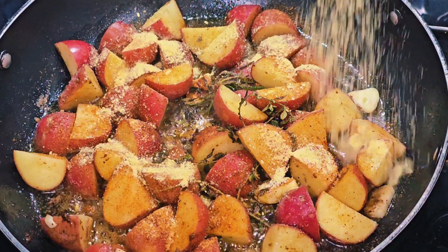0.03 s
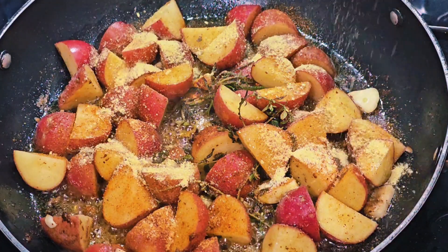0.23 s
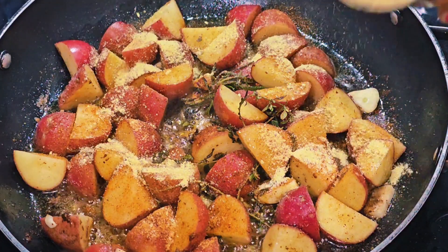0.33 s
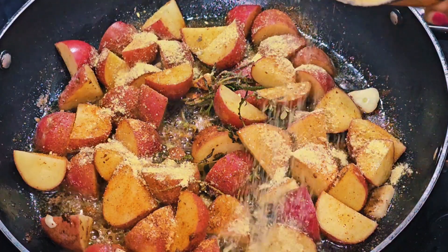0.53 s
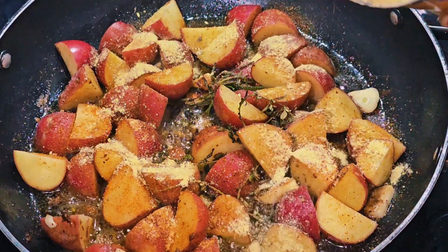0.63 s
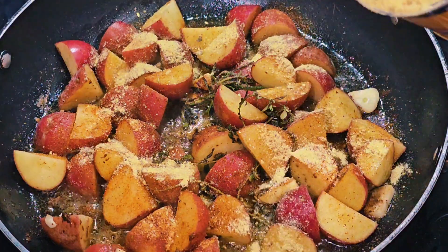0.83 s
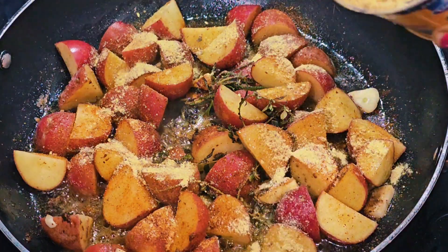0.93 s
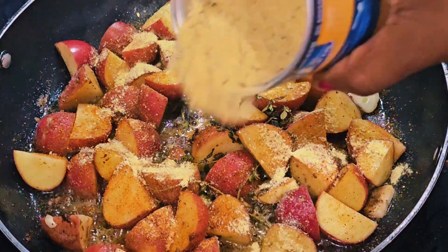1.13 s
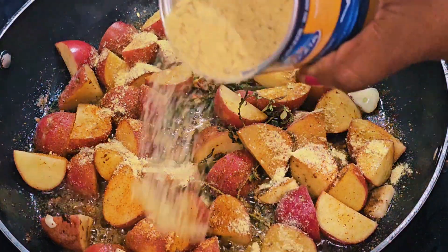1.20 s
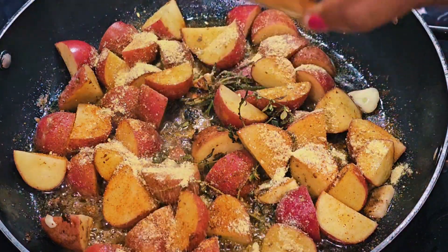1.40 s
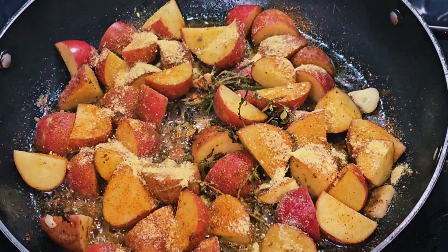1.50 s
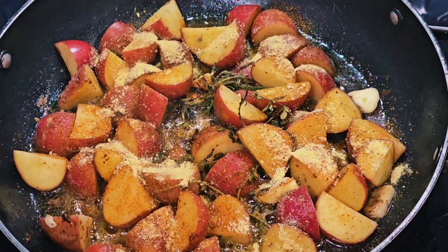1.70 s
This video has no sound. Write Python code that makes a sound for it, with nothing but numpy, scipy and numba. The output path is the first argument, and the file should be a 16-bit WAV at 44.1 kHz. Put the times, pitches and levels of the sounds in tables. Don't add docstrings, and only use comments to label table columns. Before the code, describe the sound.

A can of dry crumbs gives one hard hollow tap, then rattles unevenly as grains hit its wall, slide over the rim and patter onto food and metal; close microphone, short room echo, soft hand bumps.

```python
import sys
import numpy as np
from scipy import signal
from scipy.fft import rfft, irfft
from scipy.io import wavfile
from scipy.ndimage import uniform_filter1d
from numba import njit

SR = 44100
rng = np.random.default_rng(int(sys.argv[2]) if len(sys.argv) > 2 else 0)


def store_wav(level_fs):
    pcm = np.round(np.clip(np.atleast_2d(level_fs), -1, 1) * 32767)
    wavfile.write(sys.argv[1], SR, pcm.T.astype(np.int16))


def attenuation_scalar(level_db):
    decades = np.asarray(level_db, float) / 20
    return 10 ** decades


N = 77175
T = np.arange(N) / SR

# start in seconds, length in seconds, level in dB.
HAND_BUMPS = [(0.224, 0.18, -46), (0.36, 0.39, -45.5), (0.502, 0.07, -38), (0.628, 0.13, -50.5),
              (0.753, 0.17, -52.5), (0.909, 0.05, -45.5), (0.97, 0.059, -49), (1.044, 0.084, -39.5),
              (1.12, 0.074, -55), (1.205, 0.051, -39), (1.265, 0.076, -35.5), (1.33, 0.13, -41.5),
              (1.424, 0.21, -44.5), (1.58, 0.28, -54), (1.722, 0.027, -40.5)]
# time in seconds, level in dB.
LANDING_LEVEL = [(0, -55), (.19, -58), (.36, -38.5), (.41, -36.5), (.49, -26.5), (.55, -39.5), (.7, -40.5),
                 (.76, -42), (.8, -59), (.87, -42), (1.2, -40), (1.27, -64), (1.75, -41)]
# centre in Hz, width in Hz, level in dB.
PAN_TONES = [(497.7, 48, -5), (620, 135, -3), (760, 64, -2.5), (960, 33, -2.5), (1175, 390, -5.5)]
# time in seconds, crumb level in dB, fine dust relative to it in dB.
SLIDE_LEVEL = [(0, -47, 0), (.09, -46.5, -24), (.112, -37, -6), (.19, -46.5, 2), (.36, -41.5, -17),
               (.54, -44.5, -6.5), (.57, -31, -6), (.69, -32, -31), (.8, -36.5, -11.5), (.93, -40, -10),
               (1.1, -30.5, 1), (1.26, -42.5, 10), (1.36, -47.5, 1), (1.64, -49.5, -11), (1.75, -43.5, 12)]
# centre in Hz, width in Hz, level in dB.
RIM_TONES = [(4200, 1030, 14), (5070, 1800, 14.5), (2600, 680, 13.5)]
# centre in Hz, width in Hz, level in dB.
DUST_TONES = [(10760, 3000, 8.5), (12040, 2060, 17), (14100, 2200, 6.5)]
# frequency in Hz, density in dB per Hz.
WASH_SPECTRUM = [(150, -32), (300, -12.5), (1200, -18), (4500, -16.5), (6900, -13.5), (10500, -15),
                 (15500, -58)]
# start in seconds, length in seconds, level in dB, first pitch in Hz, last pitch in Hz.
CRUMB_STREAMS = [(0.05, 0.22, -38.5, 4040, 4200), (0.038, 0.081, -37.5, 4700, 5360),
                 (0.1, 0.19, -38.5, 6250, 5960), (.3, 0.17, -43, 7500, 8350), (0, 0.21, -42, 10400, 10100),
                 (0.26, 0.38, -41, 4200, 4020), (0.546, 0.2, -33, 5400, 5000),
                 (0.656, 0.084, -32, 4720, 4770), (0.41, 0.43, -34, 2114, 2236),
                 (0.64, 0.34, -40.5, 7430, 8340), (0.914, 0.32, -31.5, 8020, 7300),
                 (0.95, 0.29, -33, 3000, 3010), (1.0, 0.24, -36, 6230, 6300), (1.11, 0.3, -39, 4700, 4900),
                 (1.274, 0.33, -44, 5140, 5190), (1.212, 0.16, -44, 3860, 3670),
                 (1.403, 0.21, -34, 1302, 1573), (1.428, 0.44, -39.5, 2050, 2110),
                 (1.468, 1, -33, 2920, 3070), (1.532, 0.17, -41, 8200, 7400),
                 (1.655, 0.34, -33.5, 2400, 2600), (0.41, 0.14, -37.5, 620, 795),
                 (0.56, 0.21, -40, 517, 641), (0.643, 0.12, -40, 760, 787), (1.49, 0.116, -48.5, 620, 570),
                 (1.57, 0.087, -41, 731, 823), (1.66, 0.088, -42, 700, 578), (1.27, 0.097, -50.5, 960, 955),
                 (1.3, 0.08, -45, 1070, 1115), (0.54, 0.057, -32, 2180, 2060),
                 (0.79, 0.11, -34.5, 2720, 2760), (1.05, 0.19, -42, 2230, 2060), (1.1, 0.15, -45, 484, 563),
                 (1.71, 0.059, -38.5, 6170, 6600), (0.0, 0.18, -59, 329, 328),
                 (0.0, 0.12, -42.5, 7800, 8340), (0.9, 0.17, -36.5, 2580, 2570)]
# start in seconds, peak in dB, pitch in Hz, width in Hz.
HARD_CRUMBS = [
    (0.036, -29.5, 10200, 1500),
    (0.1087, -13.5, 10370, 3500),
    (0.213, -1.5, 8930, 3000),
    (0.559, -13, 3800, 3440),
    (0.678, -5.5, 4400, 3650),
    (0.73, -14.5, 3870, 3070),
    (.545, -43, 5460, 3500),
    (1.583, -21, 12500, 4000),
]
# pitch in Hz, first blow in dB, second blow in dB, rebound in dB, T60 in seconds.
CAN_MODES = [(334, -8.5, -7, 7.5, 0.036), (466, -3, -2, -4.5, 0.061), (752, -2.5, 3.5, 2.5, 0.074),
             (818, 1, 2.5, 4, 0.077), (942, -3, 3.5, -5, 0.08), (1160, 2.5, 4.5, -1.5, 0.17),
             (1329, -21, -13, -11, 0.32), (1732, 11.5, 6, -7, 0.079), (2915, -35, -2, -7, 0.077),
             (1960, -17, -4.5, -2, 0.12), (2326, -16, 0, -26, 0.13), (2396, -13, -8, -22, 0.11)]
# start in seconds, rise in seconds, chatter length in seconds, ring in dB, crumb jolt in dB.
KNOCK_BLOWS = [
    (.211, 0.0096, .02, -10.5, -12),
    (.229, 0.0051, 0.024, -12, -16),
    (.272, 0.014, 0.081, -22, -29),
]
# frequency in Hz, density in dB per Hz.
JOLT_SPECTRUM = [(1000, -25), (2000, -4), (3300, -20.5), (5000, -13.5), (6800, -27), (9300, -13),
                 (15500, -46)]
# time in seconds, level in dB, mouth brightness relative to it in dB.
RATTLE_LEVEL = [(0, -51, 8.5), (.19, -43.5, 4.5), (.36, -30.5, -12), (.42, -34, -16.5), (.5, -25, -12),
                (.57, -27.5, -18), (.6, -33, -8.5), (.7, -31.5, 0), (.8, -38.5, 0.5), (.92, -36, 1),
                (.98, -30.5, 1.5), (1.1, -30.5, 8), (1.27, -29, 0), (1.37, -34.5, 1), (1.52, -29.5, 1),
                (1.64, -29.5, -5.5), (1.75, -26.5, -9)]
# time in seconds, pitch in Hz.
TILT_PITCH = [(0, 1704), (.6, 1692), (.7, 1628), (.9, 1671), (1.08, 1594), (1.3, 1595), (1.43, 1602),
              (1.53, 1700), (1.62, 1719), (1.75, 1550)]
# centre in Hz, width in Hz, level in dB.
MOUTH_TONES = [(9296, 770, 11.5), (14100, 900, -1)]
# time in seconds, peak in dB.
WALL_LUMPS = [(0.3677, -27), (0.4345, -25), (0.4564, -23), (0.4875, -14.5), (0.5035, -14.5), (0.519, -18.5),
              (0.5332, -16.5), (0.5463, -22.5), (0.5574, -18), (0.5746, -20), (0.6212, -21), (0.655, -23),
              (0.677, -23), (0.6904, -20.5), (0.7235, -21.5), (0.831, -25), (0.9507, -22), (0.968, -17.5),
              (0.9786, -16.5), (1.0425, -24.5), (1.0745, -20), (1.0923, -20.5), (1.1223, -22),
              (1.184, -19.5), (1.2063, -19.5), (1.248, -27), (1.2739, -19.5), (1.3696, -29), (1.3883, -26),
              (1.4087, -24), (1.4244, -23), (1.4496, -25.5), (1.4677, -30), (1.482, -20), (1.508, -17.5),
              (1.5216, -18), (1.5542, -26), (1.5784, -19.5), (1.6069, -21), (1.6583, -32), (1.683, -21.5),
              (1.73, -21.5)]
# time in seconds, peak in dB.
MOUTH_CLICKS = [(0.0862, -33), (0.603, -18.5), (0.9293, -19.5), (0.9752, -21), (0.9956, -16), (1.0184, -24),
                (1.049, -19), (1.0624, -20), (1.0714, -12), (1.0779, -9), (1.0884, -16), (1.0974, -20),
                (1.1044, -8), (1.1124, -11), (1.1214, -15), (1.1488, -13), (1.161, -8), (1.1834, -17),
                (1.2054, -22), (1.3074, -16), (1.3114, -12), (1.3274, -17), (1.4681, -25), (1.482, -21),
                (1.4895, -20), (1.5209, -17), (1.5454, -18)]

BUMP_HZ, HARDER_HZ_PER_DB = 102.5, 5.5
WASH_DB = -10.5
STREAM_Q, STREAM_EDGE_FRACTION = 13.0, 0.3
TICK_T60_S, SCATTER_T60_S, SCATTER_DB = 0.016, 0.14, -6
JOLT_T60_S, FIRST_CONTACT = 0.16, 1.1
CAN_Q, CORE_Q, CORE_DB = 6.5, 40.0, -3
CLICK_HZ, CLICK_WIDTH_HZ = 9300, 440
LUMP_DB, CLICK_DB, LOOSE_DB, MOUTH_DB = -2.5, 0, -2.5, -2.5
ECHO_T60_S, ECHO_DB, ECHO_DELAY_S = 0.1, -9, 0.004
BASS_HZ, TOP_HZ = 50, 15750


def level(x):
    return x / np.sqrt(np.mean(x ** 2))


def band(x, hz, width_hz):
    return signal.lfilter(*signal.iirpeak(min(hz, 0.45 * SR), hz / width_hz, fs=SR), x)


def body(x, tones):
    out = 0
    for hz, width_hz, db in tones:
        ring = band(band(x, hz, 2 * width_hz), hz, width_hz)
        out = out + attenuation_scalar(db) * level(ring)
    return level(out)


def colour(x, spectrum):
    p = np.array(spectrum, float)
    hz = np.fft.rfftfreq(N, 1 / SR) + 1
    gain = attenuation_scalar(np.interp(np.log(hz), np.log(p[:, 0]), p[:, 1]))
    return level(irfft(rfft(x) * gain, N))


def curve(table, *cols):
    p = np.array(table, float)
    return np.interp(T, p[:, 0], sum(p[:, c] for c in cols))


def walk(rate_hz):
    k = int(SR / rate_hz)
    steps = np.repeat(rng.standard_normal(N // k + 1), k)
    smooth = uniform_filter1d(uniform_filter1d(steps, k), k)
    return level(smooth[:N])


@njit
def sweep(x, hz, q):
    y, b, l, k = np.empty(len(x)), 0., 0., 1 / q
    for i in range(len(x)):
        g = np.tan(np.pi * hz[i] / SR)
        v = (b + g * (x[i] - l)) / (1 + g * (g + k))
        b, l, y[i] = 2 * v - b, l + 2 * g * v, k * v
    return y


def crumbs(rate_hz, spread_db, dust, clump_db):
    chance, sign, size = rng.random((3, N))
    hits = (chance < rate_hz / SR) * np.sign(sign - 0.5) * attenuation_scalar(-spread_db * np.log(size + 0.03))
    return (level(hits) + dust * rng.standard_normal(N)) * attenuation_scalar(clump_db * walk(25.87))


def strikes(table, ring):
    x, unit = np.zeros(N), np.zeros(N)
    unit[N // 2] = 1
    for start_s, db in table:
        x[int(start_s * SR)] += attenuation_scalar(db)
    return ring(x) / np.abs(ring(unit)).max()


def hand():
    out, wobble = np.zeros(N), walk(29.96)
    rub = level(band(band(rng.standard_normal(N), 66, 112), 126, 127))
    for start_s, length_s, db in HAND_BUMPS:
        env = np.sin(np.pi * np.clip((T - start_s) / length_s, 0, 1) ** 0.76)
        hz = BUMP_HZ + HARDER_HZ_PER_DB * max(db + 44.5, 0)
        thud = np.sin(2 * np.pi * np.cumsum(hz * (1 + 0.0572 * wobble)) / SR)
        out += attenuation_scalar(db) * env * (thud + 0.5 * rub)
    return out


def land():
    out = np.zeros(N)
    for hz, width_hz, db in PAN_TONES:
        tone = body(crumbs(400, 3.0, 0.7, 1.5), [(hz, width_hz, 0)])
        out += attenuation_scalar(db + 3.0 * walk(8)) * tone
    return attenuation_scalar(curve(LANDING_LEVEL, 1)) * out / 2


def slide():
    mid = attenuation_scalar(curve(SLIDE_LEVEL, 1))
    top = attenuation_scalar(curve(SLIDE_LEVEL, 1, 2))
    rim = mid * body(crumbs(1500, 3.0, 0.7, 1), RIM_TONES)
    dust = top * body(crumbs(2500, 2.5, 0.8, 1), DUST_TONES)
    wash = (mid + top) * colour(crumbs(4000, 2.5, 0.8, 1.0), WASH_SPECTRUM)
    return rim + dust + attenuation_scalar(WASH_DB) * wash


def streams():
    out, grains = np.zeros(N), crumbs(1100, 2.6, 0.94, 0.)
    for k, (start_s, length_s, db, from_hz, to_hz) in enumerate(CRUMB_STREAMS):
        u = np.clip((T - start_s) / length_s, 0, 1)
        on = (u > 0) & (u < 1)
        hz = from_hz + (to_hz - from_hz) * u[on]
        own_grains = np.roll(grains, k * 3001)[on]
        ring = level(sweep(sweep(own_grains, hz, STREAM_Q), hz, STREAM_Q / 2))
        swell = np.clip(np.minimum(u, 1 - u)[on] / STREAM_EDGE_FRACTION, 0, 1)
        out[on] += attenuation_scalar(db) * swell * ring
    return out


def ticks():
    out, t = np.zeros(N), T[:4096]
    for start_s, db, hz, width_hz in HARD_CRUMBS:
        scatter = attenuation_scalar(SCATTER_DB - 60 * t / SCATTER_T60_S) * crumbs(700, 3.5, 0.5, 0.)[:len(t)]
        snap = rng.standard_normal(len(t)) * attenuation_scalar(-60 * t / TICK_T60_S)
        tick = band(band(snap + scatter, hz, width_hz), hz, width_hz)
        i = int(start_s * SR)
        out[i:i + len(t)] += attenuation_scalar(db) * tick / np.abs(tick).max()
    return out


def knock():
    out = np.zeros(N)
    for k, (start_s, rise_s, hold_s, ring_db, jolt_db) in enumerate(KNOCK_BLOWS):
        t = T - start_s
        rise = np.clip(t / rise_s, 0, 1)
        fade = attenuation_scalar(-230 * np.clip(t, 0, 1))
        push = rise * (t < hold_s) * fade * crumbs(922, 3.2, 0.69, 0.)
        if k == 0:
            push[int((start_s + rise_s) * SR)] += FIRST_CONTACT
        ring = np.zeros(N)
        for mode in CAN_MODES:
            hz, t60_s = mode[0], mode[4]
            tone = level(band(push, hz, np.log(1000) / np.pi / t60_s))
            ring += attenuation_scalar(mode[1 + k]) * tone * np.sqrt(t60_s)
        during = (t > 0) & (t < hold_s)
        out += attenuation_scalar(ring_db) * ring / np.sqrt(np.mean(ring[during] ** 2))
        decay = attenuation_scalar(-60 * np.clip(t - hold_s * 0.71, 0, 9) / JOLT_T60_S)
        jolt = colour(crumbs(2000, 1.4, 0.45, 0.89), JOLT_SPECTRUM)
        out += attenuation_scalar(jolt_db) * (t > 0) * decay * rise * jolt
    return out


def rattle():
    hits, hz = crumbs(600, 2.0, 0.8, 0.5), curve(TILT_PITCH, 1)

    def box(x):
        x = x + attenuation_scalar(CORE_DB) * sweep(x, hz, CORE_Q)
        return sweep(sweep(sweep(x, hz, CAN_Q), hz, CAN_Q), hz, CAN_Q / 2)

    def click(x):
        return band(band(x, CLICK_HZ, CLICK_WIDTH_HZ), CLICK_HZ, 2 * CLICK_WIDTH_HZ)

    mouth = body(hits + 1.5 * crumbs(1200, 2.5, 0.6, 0.), MOUTH_TONES)
    loose = attenuation_scalar(curve(RATTLE_LEVEL, 1) + LOOSE_DB) * level(box(hits))
    loose += attenuation_scalar(curve(RATTLE_LEVEL, 1, 2) + MOUTH_DB) * mouth
    lumps = attenuation_scalar(LUMP_DB) * strikes(WALL_LUMPS, box)
    clicks = attenuation_scalar(CLICK_DB) * strikes(MOUTH_CLICKS, click)
    return loose + lumps + clicks


def scene():
    crumbs_and_can = land() + slide() + streams() + ticks() + knock() + rattle()
    t = T[:8192]
    tail = rng.standard_normal(len(t)) * attenuation_scalar(-60 * t / ECHO_T60_S) * (t > ECHO_DELAY_S)
    tail = level(tail) / np.sqrt(len(t))
    echo = attenuation_scalar(ECHO_DB) * signal.fftconvolve(crumbs_and_can, tail)[:N]
    return (crumbs_and_can + echo + hand())[None]


def low_pass(x):
    return signal.sosfilt(signal.butter(12, 16020, fs=SR, output="sos"), x)


def record(dry):
    x = signal.sosfilt(signal.butter(2, BASS_HZ, "high", fs=SR, output="sos"), dry)
    x = np.tanh(x)
    x = signal.sosfilt(signal.ellip(10, 0.5, 70, TOP_HZ, fs=SR, output="sos"), x)
    return low_pass(x)


dry = scene()
out = record(dry)
store_wav(out)
```